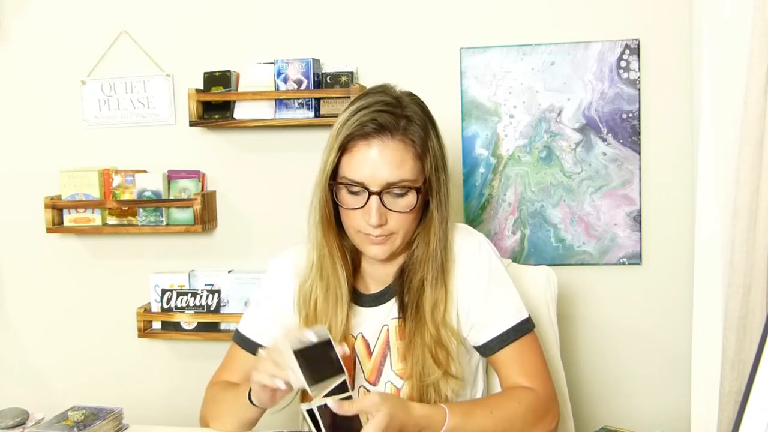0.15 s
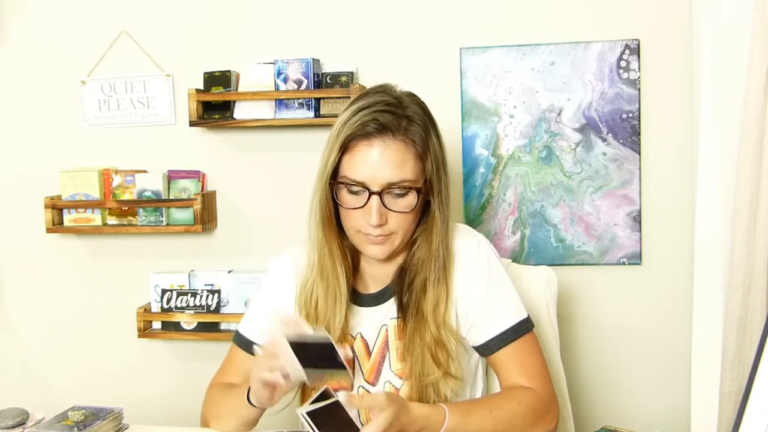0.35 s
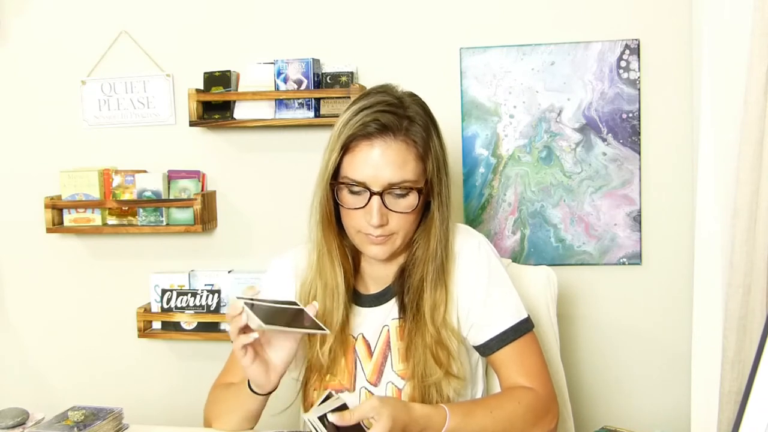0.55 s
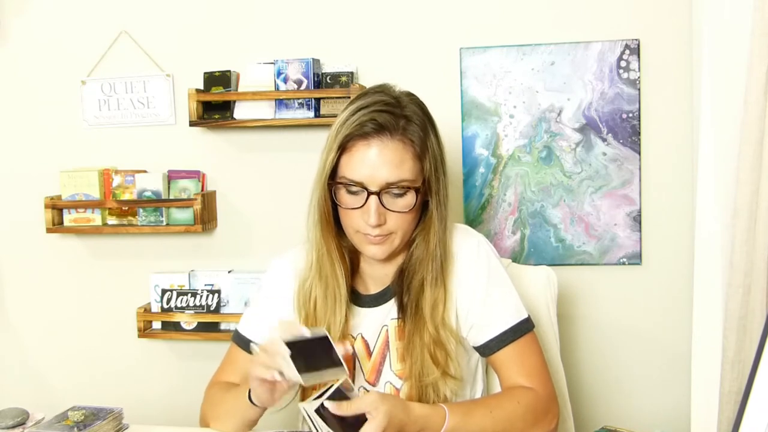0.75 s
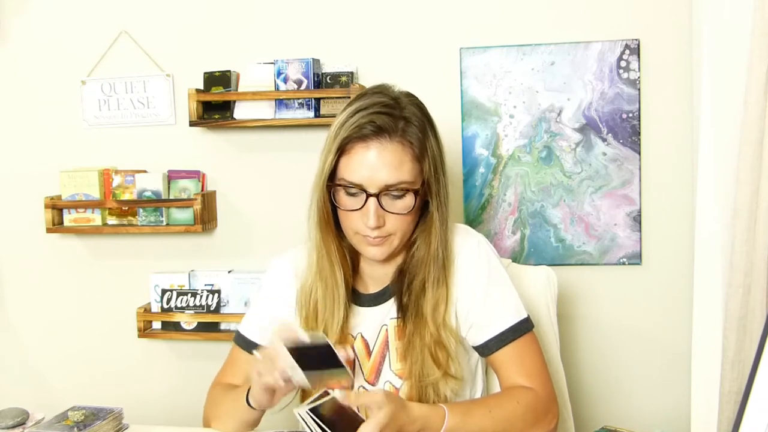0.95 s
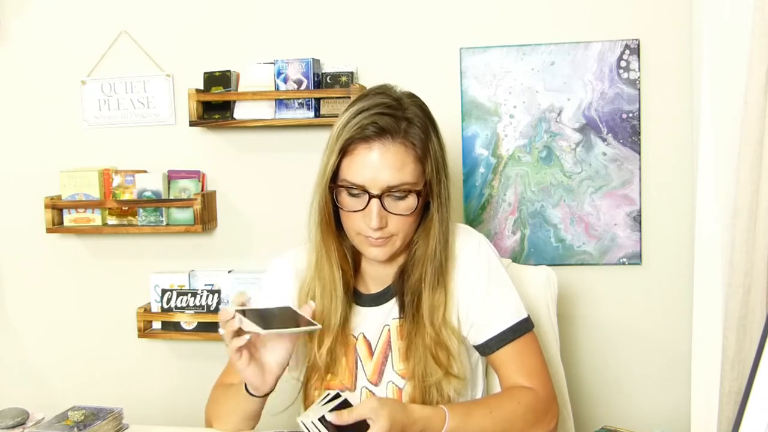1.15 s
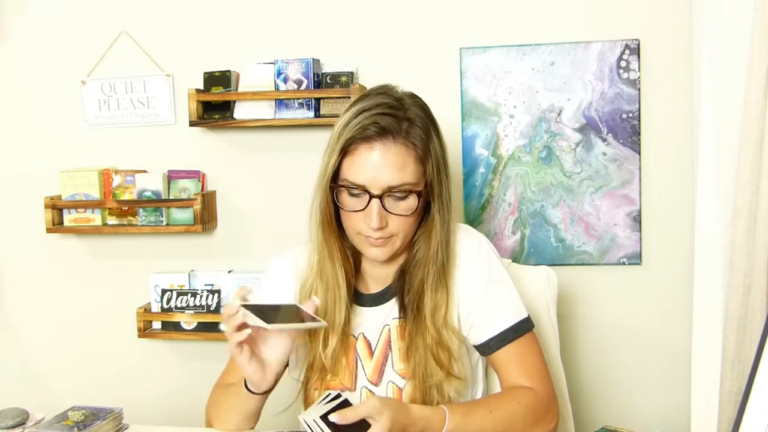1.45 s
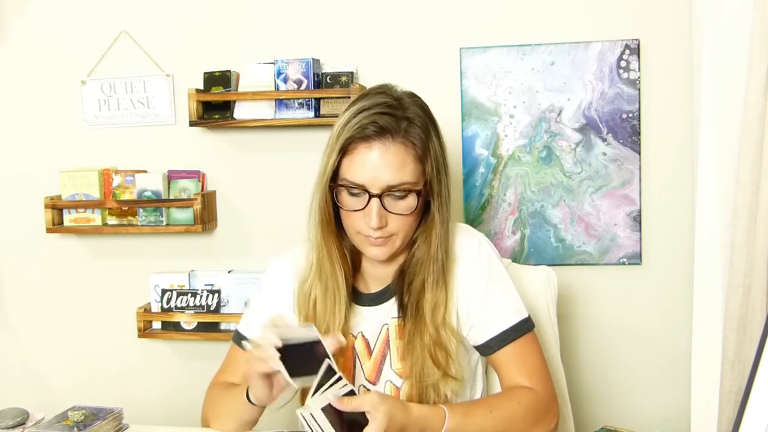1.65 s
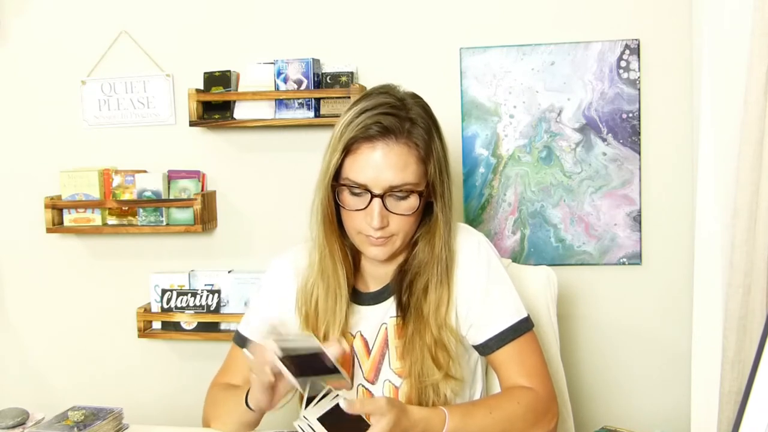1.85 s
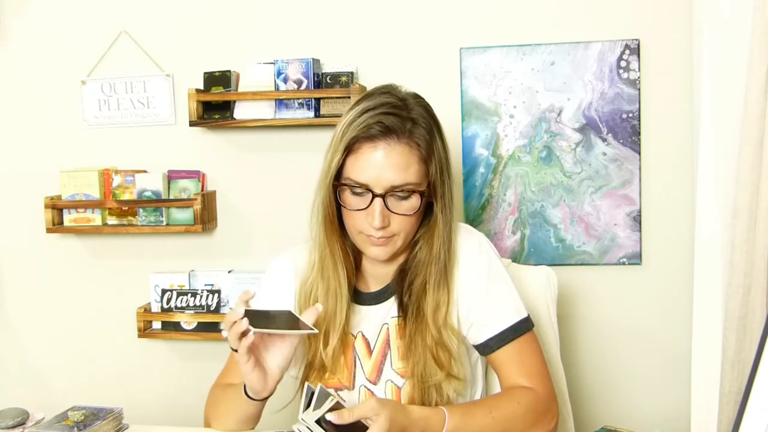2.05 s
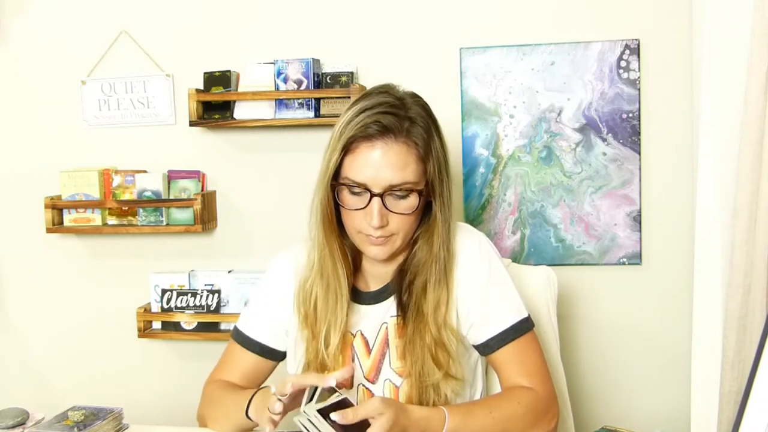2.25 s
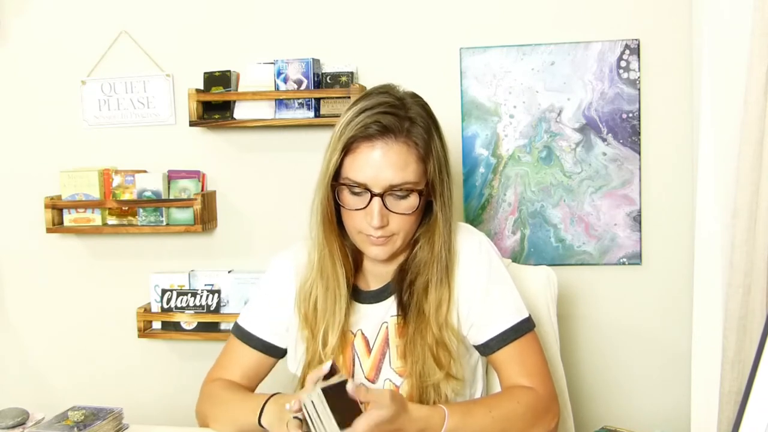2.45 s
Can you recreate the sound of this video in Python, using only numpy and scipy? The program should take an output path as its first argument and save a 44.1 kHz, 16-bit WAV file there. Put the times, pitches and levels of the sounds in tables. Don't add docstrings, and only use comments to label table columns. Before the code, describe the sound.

Card shuffling by hand: quick clusters of sharp slaps and brief sliding hisses, the hardest crack early on, then more spaced slaps and a soft hollow knock, heard fairly close in a small live room.

```python
import sys
import numpy as np
from scipy import signal
from scipy.fft import rfft, irfft, next_fast_len
from scipy.io import wavfile
from scipy.ndimage import uniform_filter1d

SR = 44100
rng = np.random.default_rng(int(sys.argv[2]) if len(sys.argv) > 2 else 0)


def how_loud(loudness_db):
    steps = np.asarray(loudness_db, float) / 20
    return 10 ** steps


def master_out(mix):
    frames = np.transpose(np.atleast_2d(mix))
    ceiling = np.clip(frames, -1, 1)
    pcm = np.round(ceiling * 32767).astype(np.int16)
    wavfile.write(sys.argv[1], SR, pcm)


N = 114660

# pitch_hz, level_db (per Hz)
VENT_COLOUR = [(25, -20.5), (100, -9.5), (230, -9), (480, -2), (1100, -8), (2200, -8.5), (7500, -22.5),
               (13500, -18.5)]
# pitch_hz, width_hz, lift_db
VENT_RESONANCES = [(2278, 160, 6), (4120, 540, 5)]
VENT_DB, VENT_PATCH_DB = -47.5, 2

# start_s, length_s, level_db, swell_share (0-1), edge_sheen_db
SLIDES = [(-.01, 0.0728, -38, 0.13, 4), (0.187, 0.0716, -28.5, 0.48, 2.5), (0.256, .035, -34, 0.41, 3.5),
          (0.282, 0.0372, -34, 0.41, -1.5), (0.509, 0.0216, -52, 0.26, -13.5),
          (0.52, 0.0426, -35, 0.12, 7.5), (0.554, 0.0309, -28, 0.48, -18), (0.828, 0.0573, -20, 0.03, 0),
          (1.106, 0.0864, -23, 0.45, -0.5), (1.412, 0.046, -49.5, 0.26, -2.5),
          (1.668, 0.1095, -36.5, 0.41, 5.5), (1.824, 0.0242, -39, 0.36, -6.5),
          (2.016, 0.0324, -34, 0.42, 6), (2.102, 0.045, -37.5, 0.19, -35), (2.317, 0.0258, -30.5, 0.07, 3),
          (2.346, 0.0198, -34.5, 0.26, 2), (2.487, 0.107, -46.5, 0.24, 5)]
SLIDE_SAG_DB, SLIDE_FALL_S = -2.5, 0.00493
SLIPS_PER_S, SLIP_SPREAD_DB, SLIP_S = 700, 2.5, 0.000634
SMOOTH_SHARE = 0.268
LEAD_IN_S, LEAD_IN_DB = 0.00404, -12.5

# start_s, peak_db, palm_thud_db, snap_db, edge_sheen_db
SLAPS = [(.0016, -18, 8, 5.5, 5.5), (0.1164, -28.5, 7.5, 5.5, 4.5), (0.2185, -22.5, -7.5, 5.5, -0.5),
         (0.2278, -5, 2, -1.5, -3.5), (.278, -5.5, 0, -11.5, -12), (.4905, -22, 14, -5, -3.5),
         (.4985, -16, -5, 1, 2), (.5332, -11, 4, -1.5, 2), (0.5809, -7, 7, -1, 0), (0.7954, -15.5, 2, 1, 0),
         (0.8212, 2, -4.5, 4.5, 9), (1.107, -14.5, 1, 2.5, -4.5), (1.1147, -5, -0.5, 3, 3.5),
         (1.186, -27, 6, -1, -1), (1.3852, -14.5, 4, -1.5, -2), (1.418, -24.5, 9.5, -9, -11),
         (1.4528, -28, -7, 11.5, 16.5), (1.7018, -32.5, 11, 13, -1.5), (1.8074, -12, 5, -11, 2),
         (2.0096, -8, -5.5, -2, -2), (2.0577, -23.5, 7.5, 13.5, 14.5), (2.085, -4.5, -3, 3, 2.5),
         (2.3109, -11, 1.5, 3, 0), (2.5368, -30.5, 8.5, 7.5, 4)]
SLAP_DB, SLAP_RISE_S, CONTACT_S = -0.5, 0.00043, 0.001359

# pitch_hz, level_db (per Hz)
CARD_COLOUR = [(88, -46), (150, -23), (854, -3.5), (3350, -4), (4080, -6.5), (8230, -15), (10200, -15),
               (13200, -21.5), (16000, -38)]
# pitch_hz, width_hz, lift_db
DECK_HOLLOWS = [(904, 246, 3.5), (7800, 535, 6.5), (2065, 683, 3.5), (4057, 127.6, 9), (5160, 490, 2.5)]
THUD_HZ, SNAP_HZ, SHEEN_HZ, BASS_CUT_HZ = 972, 3044, 7920, 198.6

# start_s, peak_db, pitch_hz
KNOCKS = [
    (0.976, -28, 384),
    (1.695, -30, 472.6),
    (1.807, -22.5, 481.8),
    (1.808, -27, 308),
    (2.345, -31, 324),
    (1.844, -26.5, 348.8),
]
KNOCK_T60_S, KNOCK_RISE_S = 0.0419, 0.0014
KNOCK_ROOM_SHARE = 0.165

# delay_s, level_db
WALLS = [(.0017, -5), (.0035, -9), (.0058, -4), (.0088, -4), (.0115, -7), (.014, -9), (.021, -15)]
WALL_SHIFT_S, WALL_SCATTER_DB = .0003, 2
WALL_DULL_HZ = 11110
# pitch_hz, fade_s
ROOM_FADE = [(250, 0.752), (700, 0.432), (2000, 0.346), (5000, 0.3633), (12000, 0.1877)]
ROOM_DB, ROOM_START_S = -3, 0.0115

NOTCH_HZ, NOTCH_WIDE_HZ, NOTCH_DB = 8270, 450, -16
TOP_HZ, OVER_TOP_DB = 15780, -18
CEILING, KNEE = .95, 4


def unit(x):
    return x / np.sqrt(np.mean(x ** 2) + 1e-20)


def along(points, hz):
    f, v = np.transpose(points)
    return np.interp(np.log(hz + 1), np.log(f + 1), v)


def bump(hz, centre_hz, wide_hz):
    return 1 / (1 + (2 * (hz - centre_hz) / wide_hz) ** 2)


def bumps(hz, resonances):
    return sum(db * bump(hz, centre, wide) for centre, wide, db in resonances)


def coloured(x, db_of):
    m = 2 * next_fast_len(N // 2 + 4096)
    gain = how_loud(db_of(np.fft.rfftfreq(m, 1 / SR)))
    cep = irfft(np.log(np.maximum(gain, 1e-6)), m)
    cep[1:m // 2] *= 2
    cep[m // 2 + 1:] = 0
    return irfft(rfft(x, m) * np.exp(rfft(cep)), m)[..., :N]


def passed(x, hz, kind, order=2):
    sos = signal.butter(order, hz, kind, fs=SR, output="sos")
    return signal.sosfilt(np.vstack([sos, sos]), x)


def ventilation():
    z = signal.stft(rng.standard_normal(N + 512), nperseg=512)[2]
    patches = uniform_filter1d(rng.standard_normal(z.shape), 6, 0)
    patches = uniform_filter1d(patches, 12, 1)
    hiss = signal.istft(z * how_loud(VENT_PATCH_DB * unit(patches)), nperseg=512)[1][:N]
    hiss = coloured(hiss, lambda hz: along(VENT_COLOUR, hz) + bumps(hz, VENT_RESONANCES))
    return how_loud(VENT_DB) * unit(hiss)


def slides():
    t = np.arange(N) / SR
    slips = (rng.random(N) < SLIPS_PER_S / SR) * how_loud(SLIP_SPREAD_DB * rng.random(N))
    grain = np.convolve(slips, np.exp(-t[:300] / SLIP_S))[:N]
    rub = unit(rng.standard_normal(N) * (SMOOTH_SHARE + unit(grain)))
    lead_ins = [(s - LEAD_IN_S, LEAD_IN_S, db + LEAD_IN_DB, 1, 0) for s, db, *_ in SLAPS]
    stroke = np.zeros((4, N))
    for s, length, db, swell, sheen_db in SLIDES + lead_ins:
        swell = np.clip(swell, .02, .98)
        u = (t - s) / length
        rise = np.clip(u / swell, 0, 1) ** 2
        sag = how_loud(SLIDE_SAG_DB * np.clip((u - swell) / (1 - swell), 0, 1))
        fall = np.exp(-np.maximum(t - s - length, 0) / SLIDE_FALL_S)
        stroke += how_loud(db + np.array([[0], [0], [0], [sheen_db]])) * rise * sag * fall
    return stroke * rub


def slaps():
    out = np.zeros((4, N + SR))
    t = np.arange(2048) / SR
    lead = 72
    shape = np.roll((1 - np.exp(-t / SLAP_RISE_S)) * np.exp(-t / CONTACT_S), lead)
    gate = np.clip((np.arange(len(t)) - lead) / SR / SLAP_RISE_S + 1, 0, 1)
    for s, db, thud_db, snap_db, sheen_db in SLAPS:
        z = rfft(rng.standard_normal(len(t)) * shape)
        even = z / np.sqrt(uniform_filter1d(abs(z) ** 2, size=24))
        crack = irfft(even) * np.linalg.norm(shape) * gate
        layer_db = np.array([[thud_db], [0], [snap_db], [sheen_db]])
        at = max(round(s * SR) - lead, 0)
        out[:, at:at + len(t)] += how_loud(db + SLAP_DB + layer_db) * crack
    return out[:, :N]


def card_sound(layers):
    thud, body, snap, sheen = layers
    top = passed(snap, SHEEN_HZ, "low") - passed(sheen, SHEEN_HZ, "high")
    upper = passed(body, SNAP_HZ, "low") - passed(top, SNAP_HZ, "high")
    whole = passed(thud, THUD_HZ, "low") - passed(upper, THUD_HZ, "high")
    whole = passed(whole, BASS_CUT_HZ, "high")

    def deck_db(hz):
        return along(CARD_COLOUR, hz) + bumps(hz, DECK_HOLLOWS)

    scale = np.sqrt(np.mean(how_loud(deck_db(np.linspace(0, SR / 2, 2000))) ** 2))
    return coloured(whole, deck_db) / scale


def knocks():
    out = np.zeros(N + SR)
    t = np.arange(SR // 5) / SR
    rise = 1 - np.exp(-t / KNOCK_RISE_S)
    for s, db, hz in KNOCKS:
        note = how_loud(db - 60 * t / KNOCK_T60_S) * rise * np.sin(2 * np.pi * hz * t)
        out[round(s * SR):][:len(t)] += note
    return out[:N]


def room(x):
    near, far = np.zeros(N + SR), np.zeros(N + SR)
    step = SR // 40
    delay_s, wall_db = np.transpose(WALLS)
    for a in range(0, N, step):
        stretch = x[a:a + step]
        shift, scatter = rng.standard_normal((2, len(WALLS)))
        taps = np.round((delay_s + WALL_SHIFT_S * shift) * SR).astype(int)
        strengths = how_loud(wall_db + WALL_SCATTER_DB * scatter) * np.sign(shift)
        echo = np.convolve(stretch, np.bincount(taps, strengths))
        near[a:a + len(echo)] += echo
        hz, t, z = signal.stft(rng.standard_normal(SR // 2), SR, nperseg=256)
        fade = how_loud(-60 * t / along(ROOM_FADE, hz)[:, None])
        tail = signal.istft(z * fade, SR, nperseg=256)[1]
        tail *= 1 - np.exp(-(np.arange(len(tail)) / SR / ROOM_START_S) ** 2)
        wet = signal.fftconvolve(stretch, tail / np.linalg.norm(tail))
        far[a:a + len(wet)] += wet
    return x + passed(near[:N], WALL_DULL_HZ, "low", order=1) + how_loud(ROOM_DB) * far[:N]


def scene():
    cards = card_sound(slaps() + slides())
    hand = knocks()
    in_room = room(cards + KNOCK_ROOM_SHARE * hand)
    beside_ear = (1 - KNOCK_ROOM_SHARE) * hand
    return (in_room + beside_ear + ventilation())[None]


def roll_off(x):
    return signal.sosfilt(signal.butter(12, 16490, fs=SR, output="sos"), x)


def record(dry):
    def microphone_db(hz):
        slope = -.012 * np.maximum(hz - TOP_HZ, 0)
        notch = NOTCH_DB * bump(hz, NOTCH_HZ, NOTCH_WIDE_HZ)
        shelf = OVER_TOP_DB / (1 + np.exp(np.clip((TOP_HZ - hz) / 60, -50, 50)))
        return slope + notch + shelf

    rounded = dry / (1 + abs(dry / CEILING) ** KNEE) ** (1 / KNEE)
    return roll_off(coloured(rounded, microphone_db))


dry = scene()
out = record(dry)
master_out(out)
```